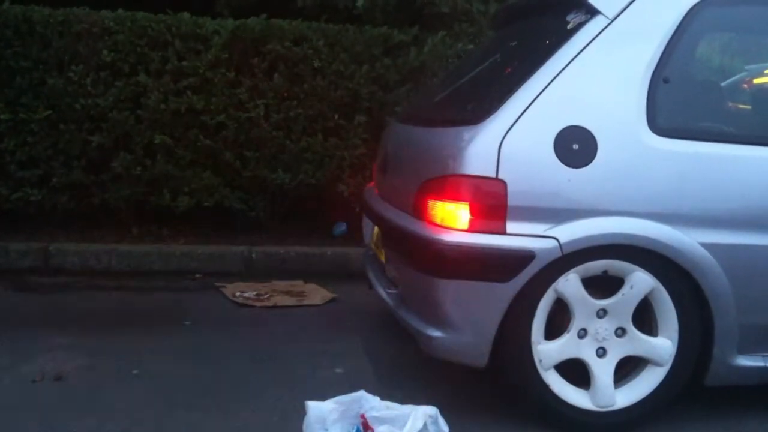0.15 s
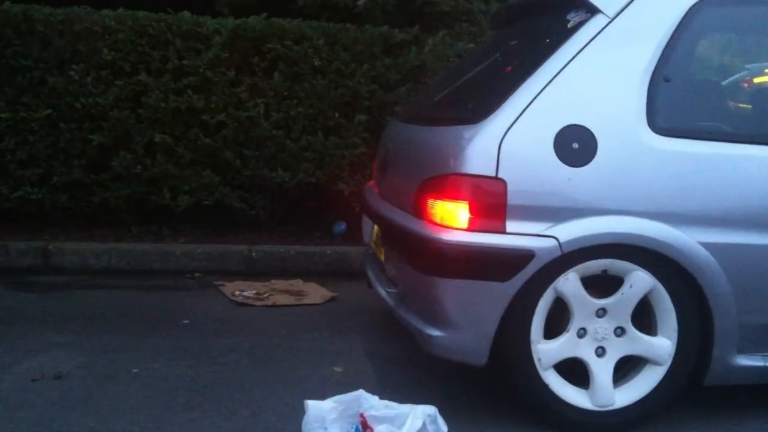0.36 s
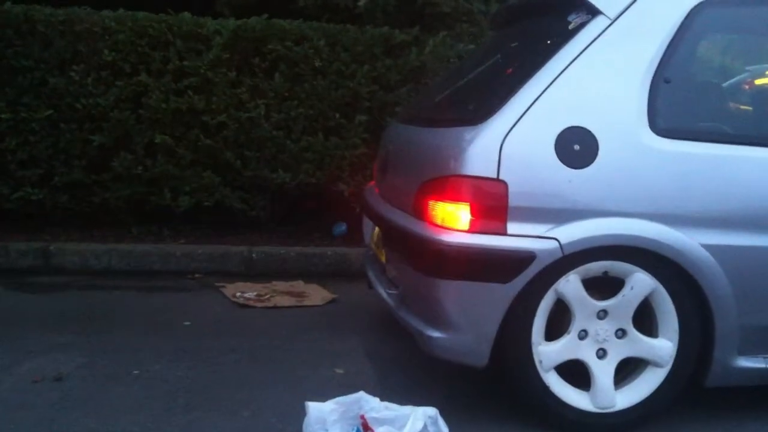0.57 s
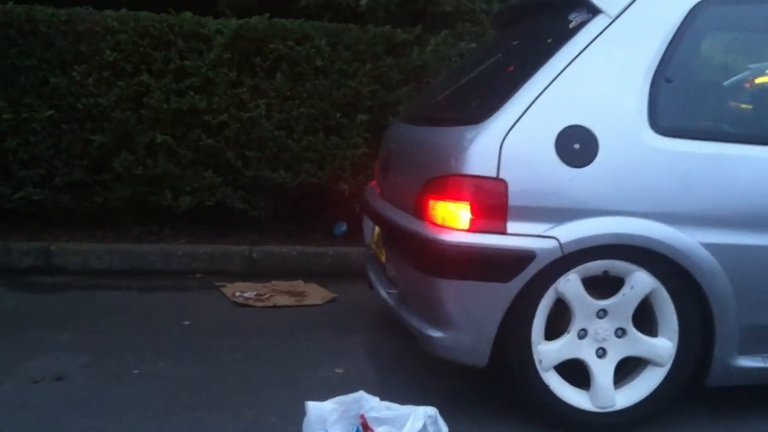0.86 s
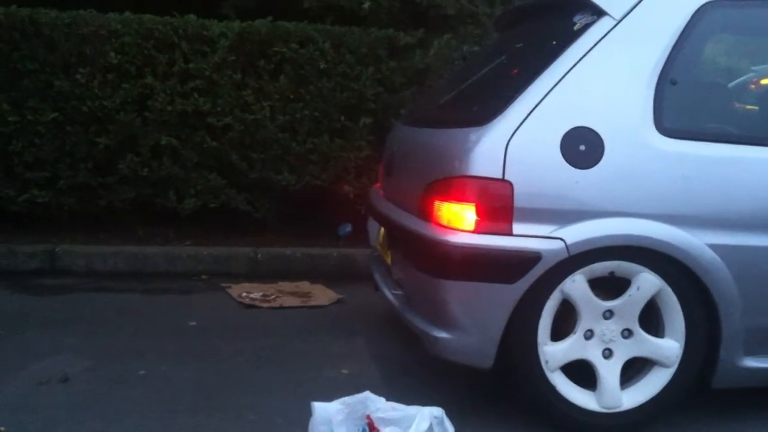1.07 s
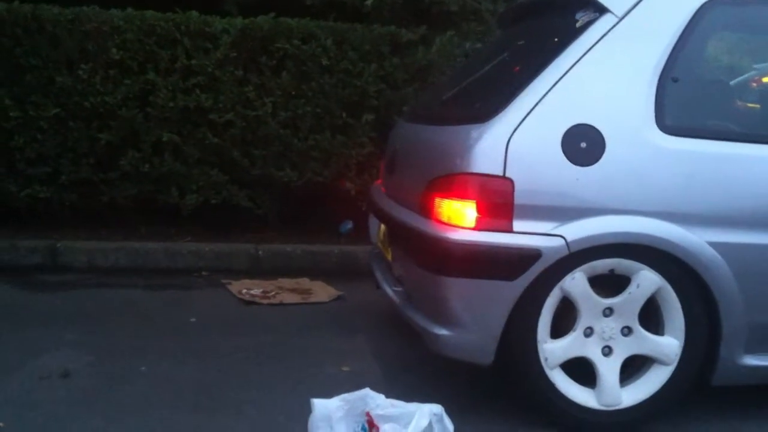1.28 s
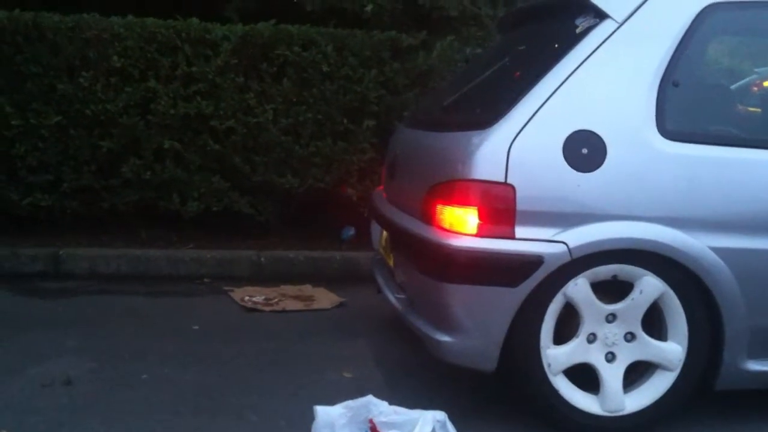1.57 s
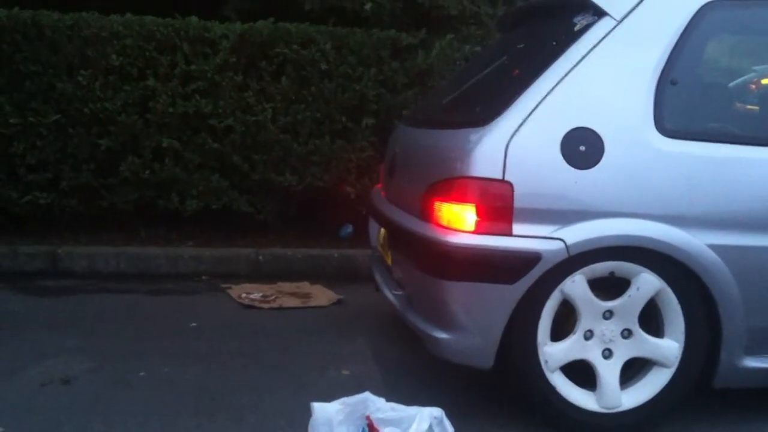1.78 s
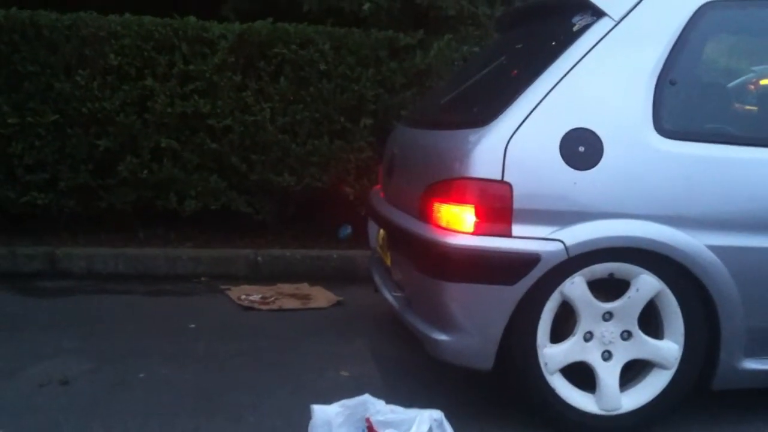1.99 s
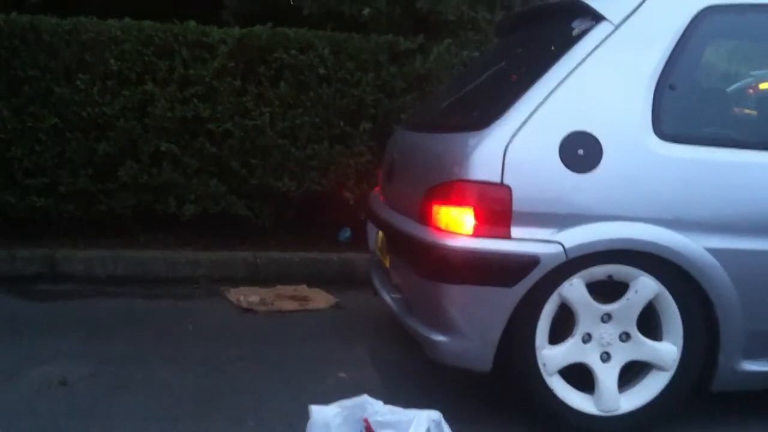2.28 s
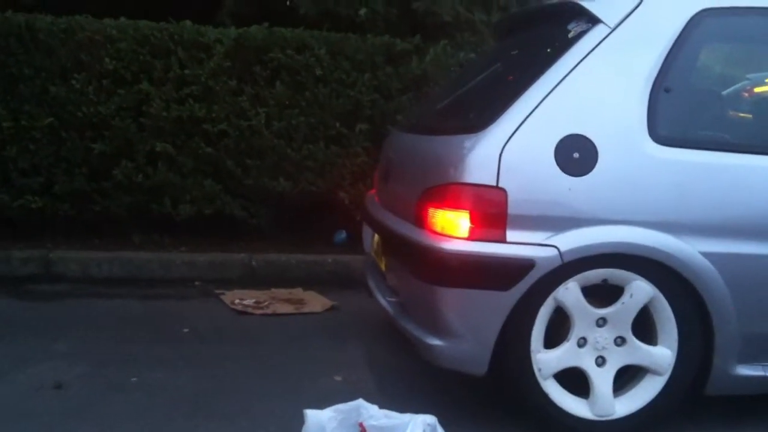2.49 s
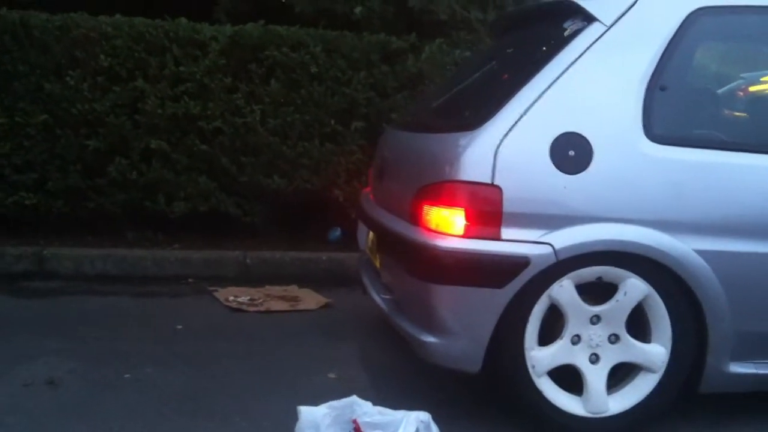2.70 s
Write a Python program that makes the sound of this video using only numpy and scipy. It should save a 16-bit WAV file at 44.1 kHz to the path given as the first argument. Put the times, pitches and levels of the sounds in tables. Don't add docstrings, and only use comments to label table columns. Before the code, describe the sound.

A parked car's exhaust backfires: falling revs, then at 0.21 s a huge roaring bang, with street echoes around 0.35 s. The engine, ducked by the phone's gain control, sinks to a low burble by 1.0 s. A raspy blip peaks at 1.37 s and drones down; a second runs 2.0-2.3 s, with small pops at 2.28 and sharp pops at 2.55-2.6 s. Metallic rattle, valve hiss, faint traffic.

```python
import sys
import numpy as np
from scipy import signal
from scipy.fft import rfft, irfft
from scipy.io import wavfile
from scipy.ndimage import uniform_filter1d

SR = 44100
rng = np.random.default_rng(int(sys.argv[2]) if len(sys.argv) > 2 else 0)


def amplitude_ratio(level_db):
    exponent = np.asarray(level_db, float) / 20
    return 10 ** exponent


def persist_wave(psi):
    counts = np.round(np.clip(psi, -1, 1) * 32767).astype(np.int16)
    wavfile.write(sys.argv[1], SR, np.atleast_2d(counts).T)


N = 125685
TIME = np.arange(N) / SR


def level(x, db):
    return x * amplitude_ratio(db) / np.sqrt(np.mean(x ** 2))


def white():
    return rng.standard_normal(N)


def band(x, hz, width):
    return signal.lfilter(*signal.iirpeak(min(hz, 0.45 * SR), hz / width, SR), x)


def ring(x, modes):
    total = np.zeros(N)
    for k, (hz, width, db) in enumerate(modes):
        total += (-1) ** k * amplitude_ratio(db) * band(x, hz, width)
    return level(total, 0)


def curve(table, col):
    points = np.array(table)
    return np.interp(TIME, points[:, 0], points[:, col])


def walk(rate):
    k = int(SR / rate)
    steps = np.repeat(rng.standard_normal(N // k + 1), k)
    return 1.267 * uniform_filter1d(uniform_filter1d(steps, k), k)[:N]


def noise(colour):
    hz = np.fft.rfftfreq(N, 1 / SR) + 1
    points = np.array(colour)
    db = np.interp(np.log(hz), np.log(points[:, 0]), points[:, 1])
    db = db - 7.6 * np.maximum(np.log2(points[0, 0] / hz), 0)
    return level(irfft(rfft(white()) * amplitude_ratio(db), N), 0)


def burst(at, hold, t60, attack=0.0018):
    t = TIME - at
    release_db = -60 * np.maximum(t - hold, 0) / max(t60, 0.005)
    return np.clip(t / attack, 0, 1) * amplitude_ratio(release_db)


def street():
    murmur = level(band(white(), 1070, 1470), -45) * amplitude_ratio(walk(5.94))
    return murmur + level(band(white(), 150, 200), -46)


# (time [s], firing rate [Hz])
FIRING_RATE = [(0.0, 102.3), (0.06, 100.6), (0.34, 85.47), (0.77, 54.52), (1.02, 47.12), (1.09, 49.6),
               (1.21, 74.93), (1.28, 87.63), (1.37, 102.7), (1.75, 79.48), (1.95, 66.96), (2.02, 69.06),
               (2.12, 96.17), (2.3, 107.5), (2.56, 93.3), (2.85, 74.5)]


def crankshaft():
    hz = curve(FIRING_RATE, 1)
    turns = np.cumsum(hz * (1 + 0.00817 * walk(30))) / SR
    return hz, turns


# (time [s], firing strength [dB], rasp of steepened pulses [dB])
THROTTLE = [(0, -33, -79), (.3, -35, -38), (.68, -38, -55), (.73, -40, -50), (.78, -37.5, -37.5),
            (1.04, -38.5, -63), (1.2, -16.5, -49), (1.28, -16.5, -19.5), (1.36, -7.5, -15),
            (1.385, -25, -45), (1.5, -33, -58), (1.97, -35, -39.5), (2.08, -12.5, -23.5),
            (2.13, -10.5, -14.5), (2.272, -11.5, -19.5), (2.3, -31, -26.5), (2.36, -30.5, -51),
            (2.85, -40.5, -52)]


def throttle():
    return amplitude_ratio(curve(THROTTLE, 1)), amplitude_ratio(curve(THROTTLE, 2))


# (time [s], level [dB], length [s])
SHIELD_BUZZ = [
    (0.106, 3.5, 0.13),
    (1.018, 4.5, 0.032),
    (1.787, 9, 0.07),
    (2.267, 14, .02),
    (2.447, 8, 0.082),
]


def heat_shield(hz):
    shield_hz, width_hz = 2032, 120
    buzz_db = 2.1 * walk(24.88)
    for at, db, length in SHIELD_BUZZ:
        buzz_db = buzz_db + db * np.exp(-((TIME - at) / length) ** 2)
    sheet = band(band(white(), shield_hz, width_hz), shield_hz, width_hz)
    return level(sheet, -40) * amplitude_ratio(buzz_db) * hz / 100


# (frequency [Hz], level [dB per Hz])
VALVE_GEAR = [(300, -10.5), (700, -6), (1050, -6.5), (1700, -5), (2200, -9.5), (2600, -14.5), (6300, -19.5),
              (16000, -31.5)]


def valve_gear(hz, turns, load):
    speed_gain = amplitude_ratio(-32.5 + 10.5 * np.log2(hz / 100))
    effort = speed_gain + amplitude_ratio(-24.5) * uniform_filter1d(load, 400)
    clatter = noise(VALVE_GEAR) * (1 + 0.1 * np.cos(2 * np.pi * turns)) * amplitude_ratio(3.6 * walk(15))
    hiss = amplitude_ratio(-22.5) * load * level(band(white(), 6400, 13000), 0)
    return effort * clatter + hiss


# (start [s], end [s], level [dB])
DRONE_SPELLS = [(-.1, 0.2, -30.5), (.28, .5, -40.5), (.5, .7, -49), (.74, .86, -50), (1.194, 1.302, -29),
                (1.293, 1.371, -25), (1.387, 1.684, -30), (1.694, 1.97, -41.5), (2.053, 2.274, -26.5),
                (2.333, 2.584, -29.5), (2.62, 2.9, -40.5)]
# (multiple of firing rate [1], level [dB])
DRONE_HARMONICS = [(1, 0.5), (2, -11), (3, -12.5), (4, -19.5), (5, -13)]


def overrun_drone(turns):
    gate = sum(amplitude_ratio(db) * ((TIME > start) & (TIME < end)) for start, end, db in DRONE_SPELLS)
    gate = uniform_filter1d(gate, int(0.015 * SR))
    drone = np.zeros(N)
    for k, db in DRONE_HARMONICS:
        waver_db = 4.1 * walk(9.05) * (k > 1) + 1.1 * walk(12.4)
        drone += amplitude_ratio(db + waver_db) * np.sin(2 * np.pi * k * turns + 1.36 * k)
    return np.sqrt(2) * gate * drone


# (frequency [Hz], width [Hz], level [dB])
PIPE_MODES = [(106, 94, -3), (184, 70, 2.5), (289.5, 48, -12), (368, 84, -18.5)]
# (frequency [Hz], width [Hz], level [dB])
RASP_MODES = [(430, 37, 6), (500, 39, 2), (610, 56, 0), (743, 90, -4.5), (992.2, 86, -0.5),
              (1182, 58, -1.5), (1690, 330, -23)]
CYLINDERS = [0.69, -3.2, 1, -2]


def exhaust(hz, turns, load, rasp):
    at = np.flatnonzero(np.diff(np.floor(turns)) > 0)
    chance = rng.standard_normal((len(at), 4))
    cylinder_db = np.array(CYLINDERS)[np.arange(len(at)) % len(CYLINDERS)]
    low, high = np.zeros(N), np.zeros(N)
    low[at] = amplitude_ratio(cylinder_db + 2.0 * chance[:, 0])
    high[at] = amplitude_ratio(cylinder_db + 2.6 * chance[:, 1])
    late = at + (0.448 + 0.055 * chance[:, 2]) * SR / hz[at]
    high[np.minimum(late.astype(int), N - 1)] -= amplitude_ratio(-1 + 3.5 * chance[:, 3])
    thump = ring(low * load, PIPE_MODES) * np.sqrt(np.mean(load ** 2))
    thump = signal.lfilter(*signal.butter(2, 85, "high", fs=SR), thump)
    fronts = ring(band(high, 850, 2200) * rasp, RASP_MODES) * np.sqrt(np.mean(rasp ** 2))
    gas = np.exp(-(2 * turns % 1) / 1.1) * band(white(), 713, 860)
    return thump + fronts + rasp * level(gas, -11.5)


def engine():
    hz, turns = crankshaft()
    load, rasp = throttle()
    mechanical = heat_shield(hz) + valve_gear(hz, turns, load)
    return mechanical + overrun_drone(turns) + exhaust(hz, turns, load, rasp)


# (time [s], thump level [dB], crack level [dB], crack centre [Hz], crack t60 [s])
FUEL_POPS = [(0.2109, -13.5, -32, 900, .02), (0.2137, -4, -16, 900, 0.036), (.247, -19, -14, 500, 0.067),
             (1.298, -20, -27, 900, 0.037), (1.645, -27, -28, 900, 0.11), (2.283, -15, -17.5, 910, .04),
             (2.29, -8, -22.5, 10500, 0.055), (2.5469, -4.5, -14, 598.7, 0.067),
             (2.573, -17.5, -41, 700, 0.039), (2.6012, -8, -12, 1060, 0.043),
             (2.6027, -36, -32.5, 3550, 0.079), (2.608, -11, -15, 1080, 0.1)]


def pops():
    out = np.zeros(N)
    for at, thump_db, crack_db, hz, t60 in FUEL_POPS:
        thump = np.sin(2 * np.pi * 190 * (TIME - at)) * burst(at, 0.0023, 0.028)
        front = np.sin(2 * np.pi * 520 * (TIME - at)) * burst(at, 0.00071, 0.02, 0.00014)
        crack = level(band(white(), hz, 0.6 * hz), 0) + level(white(), -19)
        out += amplitude_ratio(thump_db) * (thump + 0.82 * front)
        out += amplitude_ratio(crack_db) * crack * burst(at, 0.0013, t60, 0.00023)
    return out


# (frequency [Hz], level [dB per Hz])
ECHO_COLOUR = [(120, -34), (200, -13), (1230, -5), (1450, -15.5), (1840, -8), (2470, -15), (8420, -27.5),
               (16000, -46)]
# (delay after the bang [s], level [dB], hold [s], t60 [s])
HOUSE_ECHOES = [
    (0.053, -38, 0.01, 1.),
    (0.122, -33.5, .012, 0.071),
    (0.142, -25, 0.022, 0.089),
    (0.169, -31.5, 0.017, 0.62),
    (.21, -37, 0.018, .1),
]


def house_echoes():
    bang_s = 0.2115
    far = sum(amplitude_ratio(db) * burst(bang_s + delay, hold, t60, 0.00084) for delay, db, hold, t60 in HOUSE_ECHOES)
    return noise(ECHO_COLOUR) * far * amplitude_ratio(2.0 * walk(120))


# (frequency [Hz], level [dB per Hz])
JET_COLOUR = [(59, -46), (100, -16), (281, 1), (467, -5), (791, 2), (1550, -3.5), (1730, 0.5), (8410, -6),
              (15500, -8.5)]


def backfire():
    blast_s, hold_s, t60_s = 0.2167, 0.032, 0.14
    roar = noise(JET_COLOUR)
    dull = signal.lfilter(*signal.butter(2, 4500, fs=SR), roar)
    bright = (roar - dull) * amplitude_ratio(1.5)
    jet = dull * burst(blast_s, hold_s, t60_s, 0.003)
    jet += bright * burst(blast_s, 0.64 * hold_s, 1.05 * t60_s, 0.0036)
    jet = jet * amplitude_ratio(-5.5 + 0.81 * walk(150))
    return 0.64 * np.tanh(jet / 0.55)


# (time [s], depth [dB], recovery [s])
GAIN_DUCKS = [
    (.225, -11.5, 0.48),
    (1.37, -1.5, 0.39),
    (2.61, -10, 0.66),
]


def scene():
    duck_db = np.zeros(N)
    for at, depth_db, recovery in GAIN_DUCKS:
        fall = np.clip((TIME - at) / 0.016, 0, 1)
        duck_db += depth_db * fall * np.exp(-np.maximum(TIME - at, 0) / recovery)
    steady = (street() + engine()) * amplitude_ratio(duck_db)
    return (steady + pops() + house_echoes() + backfire())[None]


def top_cut(x):
    return signal.sosfilt(signal.butter(12, 16380, fs=SR, output="sos"), x)


def record(dry):
    bass_cut = signal.butter(3, 70, "high", fs=SR, output="sos")
    x = signal.sosfilt(bass_cut, dry)
    limited = 0.79 * np.tanh(x / 0.81)
    return top_cut(limited)


dry = scene()
out = record(dry)
persist_wave(out)
```